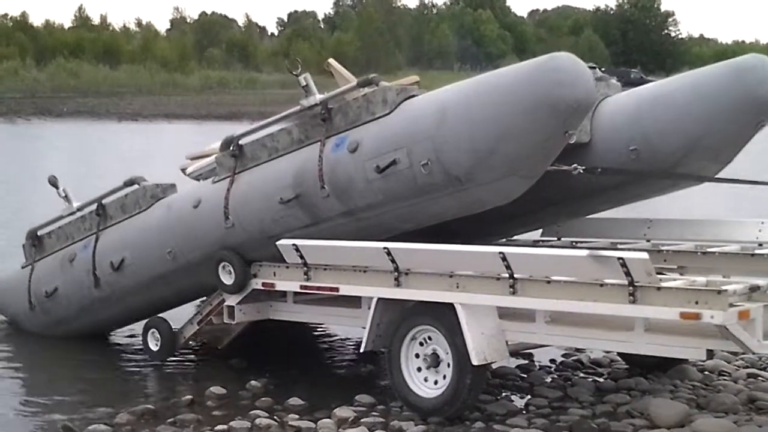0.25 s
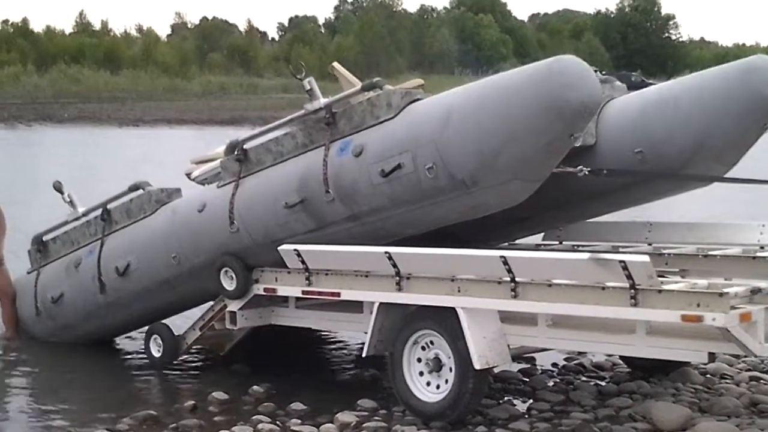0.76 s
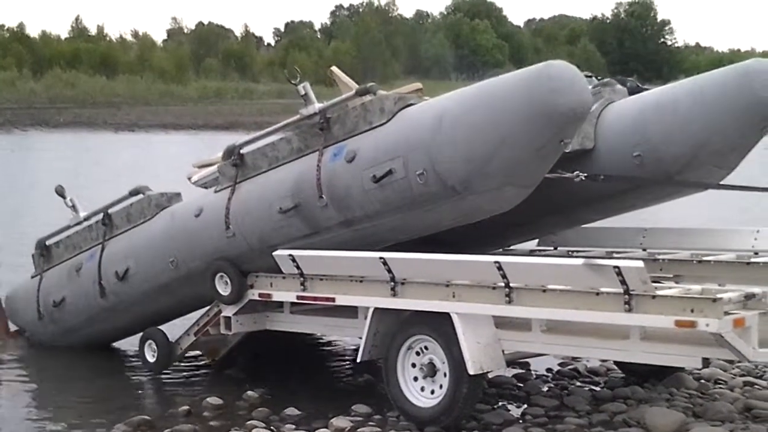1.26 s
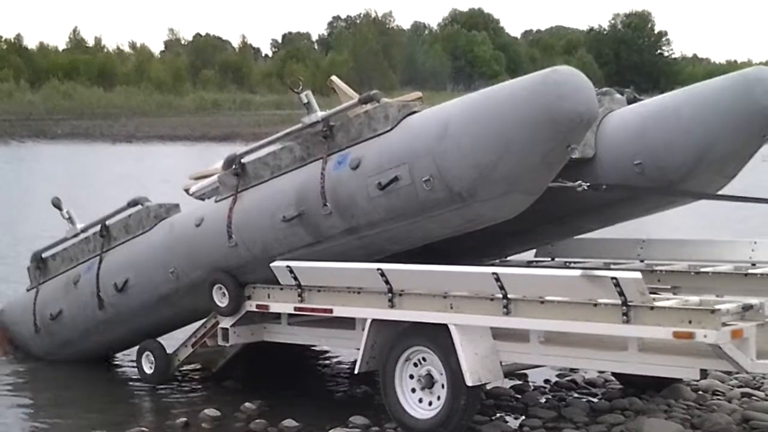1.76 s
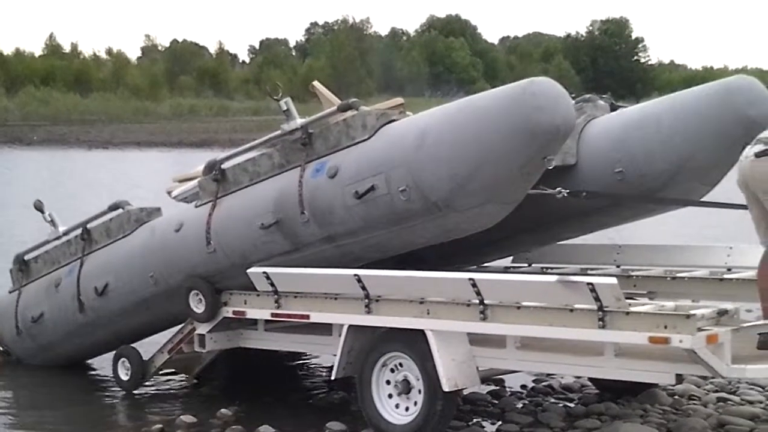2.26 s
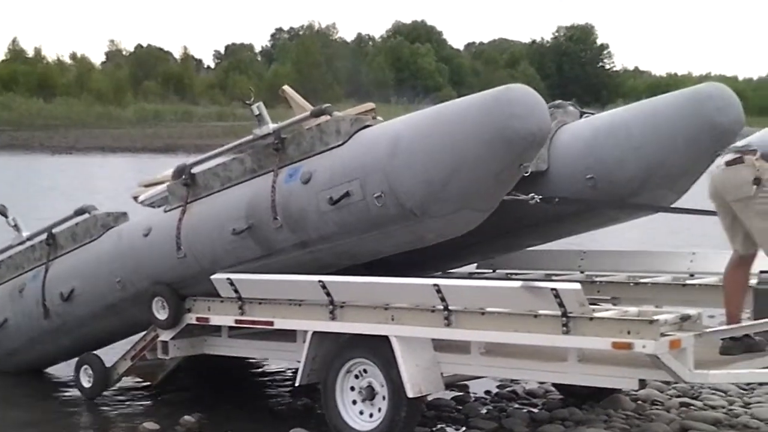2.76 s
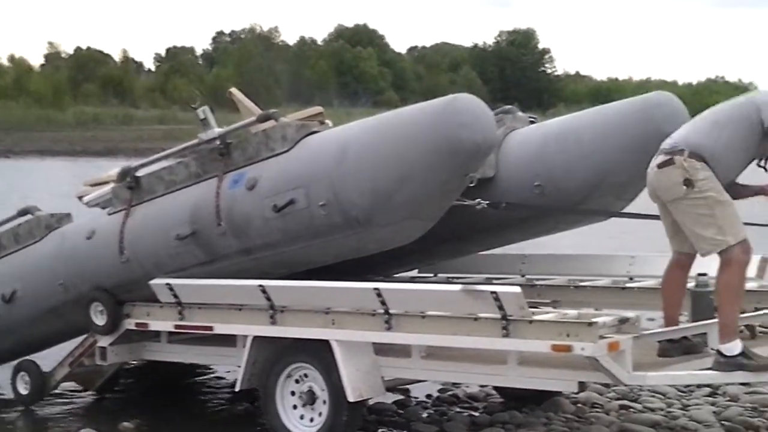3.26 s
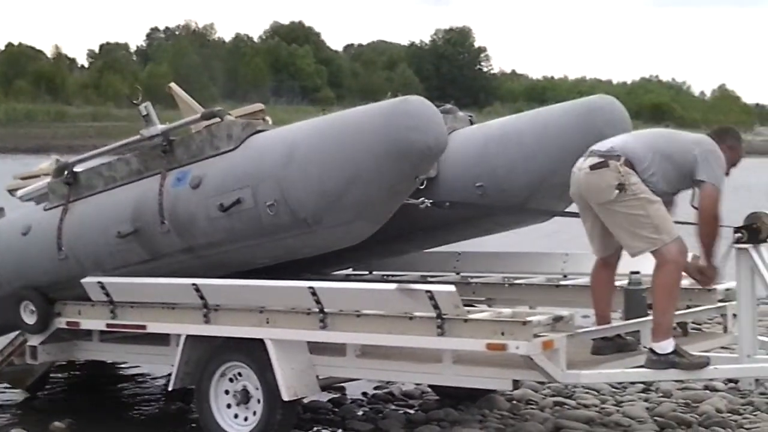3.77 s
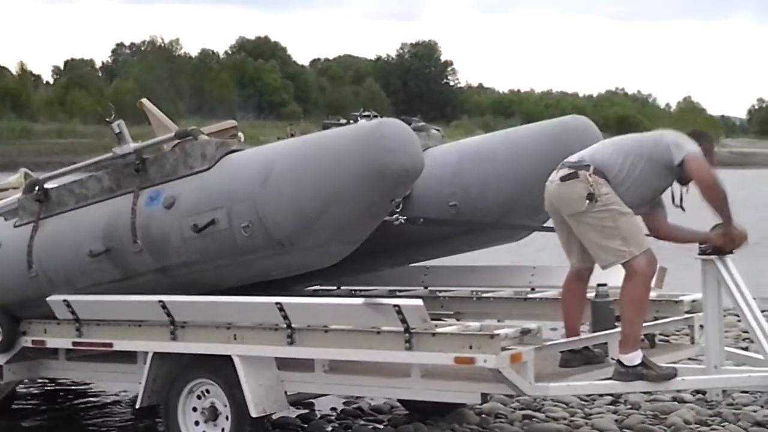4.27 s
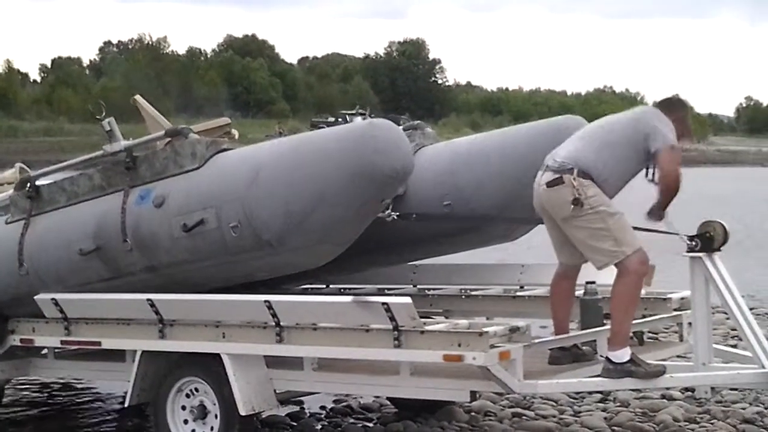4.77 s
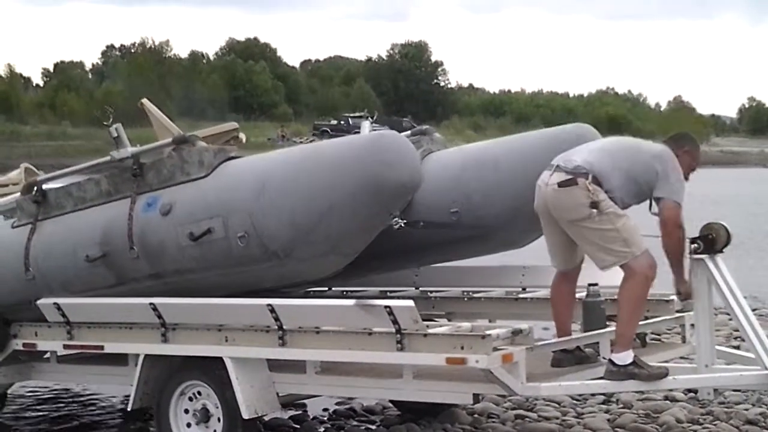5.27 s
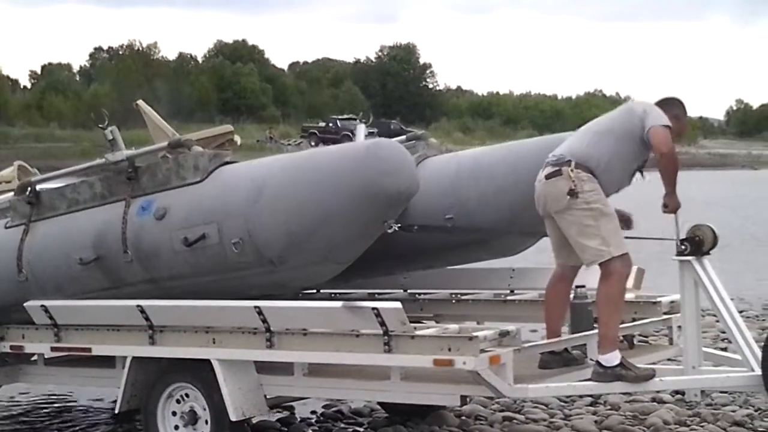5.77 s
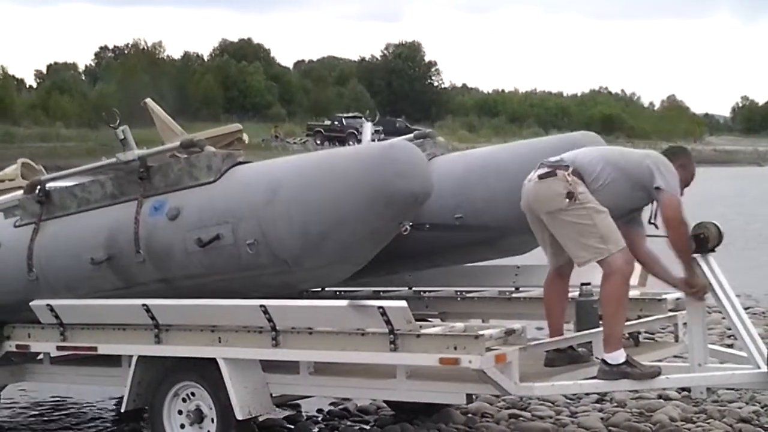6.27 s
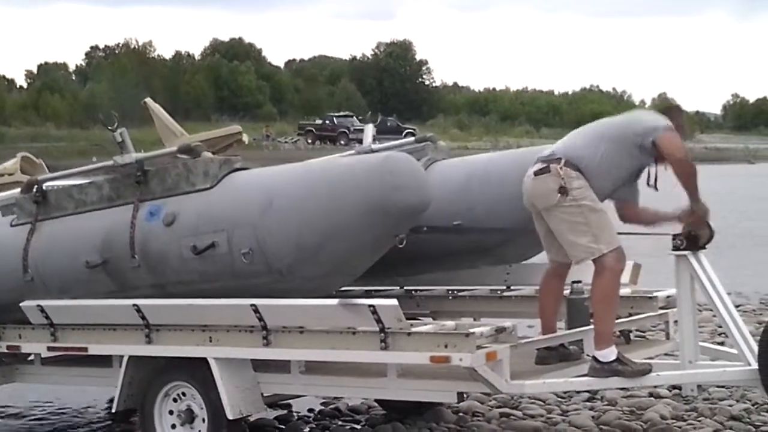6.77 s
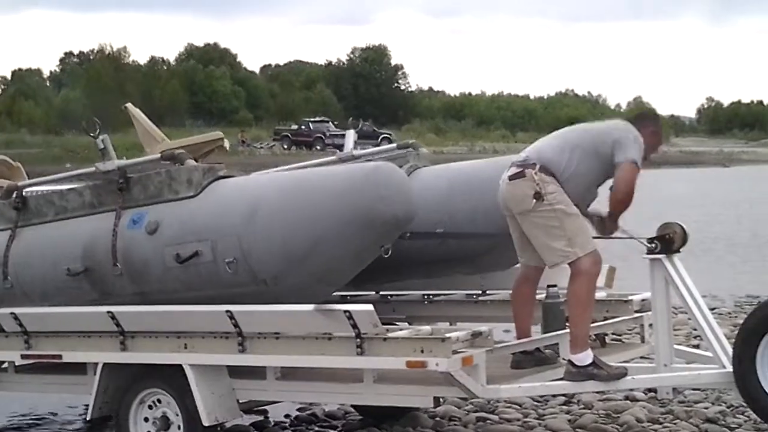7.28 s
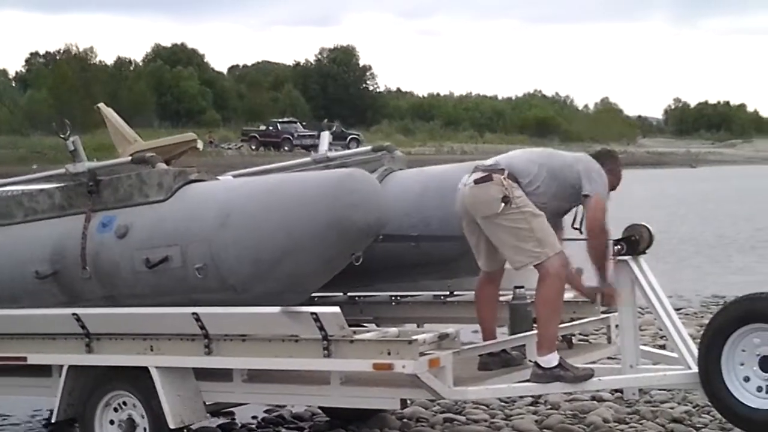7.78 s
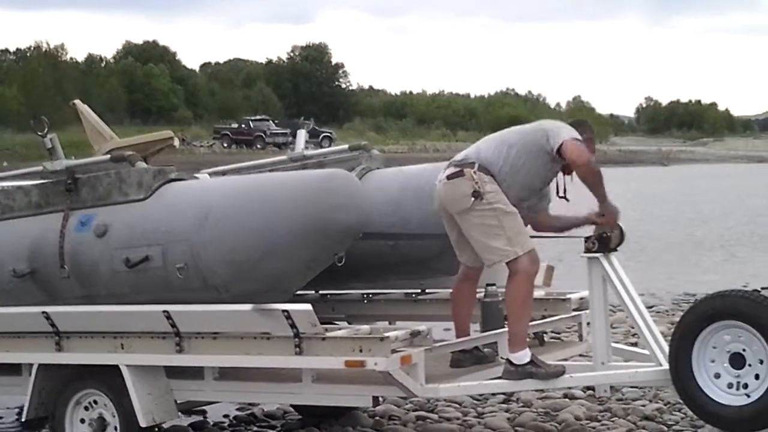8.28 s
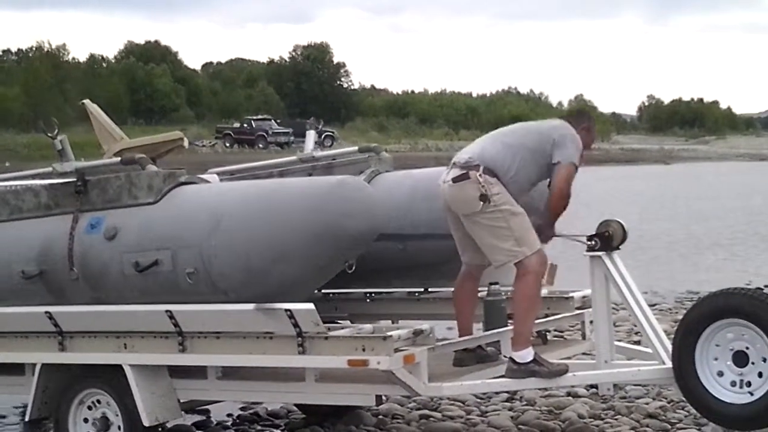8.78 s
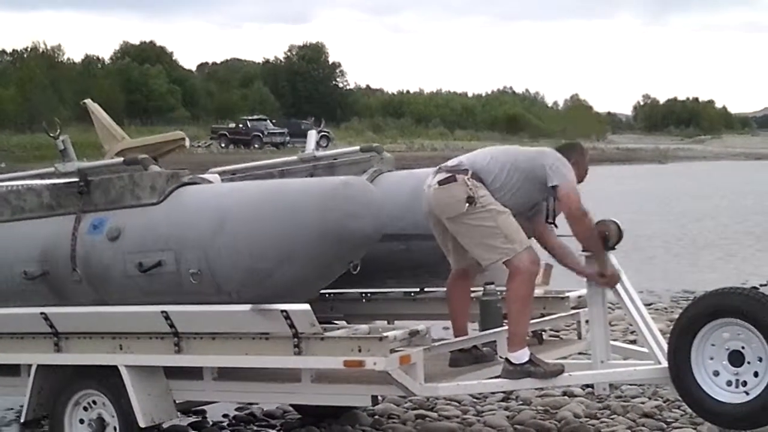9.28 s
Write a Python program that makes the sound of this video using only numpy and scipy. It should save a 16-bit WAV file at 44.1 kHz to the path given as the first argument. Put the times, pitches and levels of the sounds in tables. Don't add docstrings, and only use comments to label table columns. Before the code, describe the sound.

A hand-cranked metal winch ratchets loudly and rapidly on a boat trailer, sharp clacks in uneven bursts, with light wind and river hiss.

```python
import sys
import numpy as np
from scipy import signal
from scipy.fft import rfft, irfft, next_fast_len
from scipy.io import wavfile
from scipy.ndimage import uniform_filter1d, map_coordinates

SR = 44100
rng = np.random.default_rng(int(sys.argv[2]) if len(sys.argv) > 2 else 0)


def transcribe(signal):
    frames = np.atleast_2d(signal).T
    limited = np.clip(frames, -1, 1)
    pcm = np.round(limited * 32767).astype(np.int16)
    wavfile.write(sys.argv[1], SR, pcm)


def volts_from_decibels(level):
    exponent = np.asarray(level, float) / 20
    return 10 ** exponent


N = 419832
LIFE_SAMPLES = SR // 4

# (first tooth [s], teeth
# [count], first gap [ms], last gap [ms])
STROKES = [(0.0195, 3, 90.2, 60.3), (0.2206, 3, 50.2, 56.3), (0.4218, 3, 69.3, 72.9),
           (0.6304, 3, 58.7, 64.0), (0.9079, 5, 70.2, 38.6), (1.161, 3, 60.4, 70.2),
           (1.3467, 3, 60.4, 62.5), (1.8877, 5, 77.9, 66.8), (2.2504, 3, 73.4, 64.2),
           (2.4472, 5, 66.4, 77.4), (2.8078, 6, 62.7, 51.1), (3.1474, 5, 51.1, 61.1),
           (3.4411, 5, 68.9, 72.9), (3.7879, 5, 55.6, 61.4), (4.0983, 5, 76.5, 59.1),
           (4.4178, 3, 42.1, 46.1), (4.5961, 6, 64.9, 75.4), (5.0369, 4, 61.6, 47.9),
           (5.2483, 3, 61.5, 105.4), (5.4782, 4, 69.0, 60.2), (6.0988, 7, 89.0, 52.5),
           (6.574, 4, 50.2, 59.6), (6.8079, 3, 67.4, 60.6), (6.9937, 6, 53.6, 58.7),
           (7.3428, 6, 76.1, 65.3), (7.7517, 6, 47.4, 59.1), (8.0843, 5, 78.7, 75.2),
           (8.459, 8, 56.3, 64.8), (8.9594, 3, 90.6, 86.9), (9.2109, 6, 62.2, 56.9)]
# (strength [dB], looseness of the pawl seat [dB])
GRIP = [(1.5, 1), (0, 0), (1.5, 0.0), (0, 0.5), (1, 2), (0, -0.5), (1.5, -0.5), (-0.5, 1.5), (0.5, 1),
        (1.5, -1.0), (-0.5, 2.5), (-1, -2.5), (0.5, 2), (1, -1.0), (1.0, -1.0), (-1.0, 1.5), (1, 1),
        (0.5, 1), (-2.0, -1.5), (1.5, -2), (0.0, 0.5), (-0.5, -2.0), (0, 0), (0.0, -0.5), (0.5, 1),
        (0, 1.5), (0.5, 3), (0.5, -1.0), (1, -0.5), (0.5, 1)]
# (time [s], peak [dB], post ring [dB])
SLIPS = [
    (1.714, -13, -24),
    (5.8304, -15, -20),
    (5.9568, -5, -49),
]
POST_HZ = [447, 495, 987, 1052, 1108]
# (level [dB], t60 [s])
POST_MODES = [(-8.5, 0.12), (-16, 0.19), (0, 0.12), (6.5, 0.073), (7, 0.052)]
POST_SIGN = [1, -1, 1, 1, 1]
DRUM_HZ = [1442, 1603, 1719, 1885, 1980, 2260, 2605, 2808, 2915, 3085, 3530, 3660]
GEAR_HZ = [3787, 4090, 4708, 4950, 5230, 5390, 5500, 5715, 8365, 8690, 11300]
# (level [dB], t60 [s])
DRUM_GEAR_MODES = [(-15, .17), (-11, .22), (-11, .18), (-11, .15), (-7, .11), (-12, .11), (-6, .13),
                   (-5, .15), (-8, .11), (-8, .12), (-8, .11), (-7, .11), (0, .13), (-5, .14), (-7, .12),
                   (-5, .1), (-7, .11), (-7, .14), (-7, .12), (-10, .11), (-20, .12), (-22, .11),
                   (-16, .09)]
# (frequency [Hz], density [dB per Hz])
SHEET_COLOUR = [(150, -72), (300, -22), (600, -26.5), (1010, -13), (1350, -18.5), (1950, -4.5), (2400, -11),
                (2750, -2.5), (3300, -7.5), (3800, -0.5), (5600, -5.5), (6400, -13), (11500, -22.5),
                (15500, -26.5)]
# (frequency [Hz], t60 [s])
SHEET_DECAY = [(300, 0.37), (1000, 0.44), (2500, 0.14), (4500, 0.076), (8000, 0.11), (13000, 0.073)]
# (frequency [Hz], time constant [s])
SHEET_RISE = [(300, 0.0068), (1100, 0.0034), (1600, 0.00068), (2700, 0.0003), (3800, 0.0033),
              (5000, 0.0014), (9000, 0.00016)]
# (time [s], frequency [Hz], level [dB], t60 [s])
PINGS = [
    (5.832, 2560, -24, .1),
    (5.834, 4750, -29, .08),
    (5.958, 2000, -24, .25),
    (5.960, 4120, -21, .11),
    (1.715, 2100, -33, .14),
    (1.223, 2250, -19, .09),
]
# (time [s], peak [dB], frequency [Hz])
GUSTS = [(3.398, -24, 288), (3.845, -29, 189), (4.071, -31, 236), (4.106, -24, 233), (4.182, -25.5, 301),
         (4.23, -24, 255), (4.257, -25, 186), (4.515, -35, 220), (4.568, -24, 207), (4.858, -15.5, 298),
         (4.911, -21.5, 253), (4.928, -29, 172), (5.299, -24.5, 196), (5.946, -29.5, 197),
         (6.017, -21, 209), (6.035, -31, 215), (6.19, -25, 217), (6.222, -13.5, 306), (6.493, -24, 209),
         (6.533, -14, 226), (6.581, -32, 242), (6.687, -27, 253), (6.753, -24, 244), (7.066, -19, 195),
         (7.275, -27, 244), (7.304, -28, 187), (7.649, -29, 174), (7.746, -25, 320), (9.053, -26, 220),
         (9.084, -28, 193)]
# (time [s], level [dB])
WIND_LEVEL = [
    (0.0, -51.5),
    (1.35, -58.5),
    (1.77, -61),
    (2.15, -56),
    (5.01, -53),
    (5.73, -59),
    (6.73, -52),
    (7.42, -59),
    (9.52, -50),
]
# (frequency [Hz], density [dB per Hz])
RUMBLE_COLOUR = [(12, -47), (20, 5), (76, -30), (134, 2.5), (173, -12.5), (214, 1.5), (315, -2), (344, 3.5),
                 (400, 1.5), (520, -5), (880, -120)]
# (time [s], from [Hz], to [Hz], level [dB])
BIRD_NOTES = [
    (0.871, 5240, 4900, -54),
    (5.925, 4650, 4350, -54),
    (6.075, 4900, 4300, -49),
]
# (frequency [Hz], density [dB per Hz])
RIVER_COLOUR = [(180, -32), (300, -2), (535, -6), (1180, -1), (1370, -7), (1620, -6), (4210, -13),
                (6250, -22), (14000, -23), (15500, -43)]
# (frequency [Hz], weakest surviving line [dB])
TREBLE_FLOOR = [(8000, -60), (9500, -50), (10200, -46), (11600, -45.5), (12000, -45), (15000, -46)]
# (frequency [Hz], level [dB])
SIDE_COLOUR = [(40, -5), (150, -1), (2000, -4), (8000, 1.5)]

DROP_DB, POST_DB, BRIGHT_DB = -1.02, -22, -0.43
LOOSE_POST_DB_PER_DB, LOOSE_BRIGHT_DB_PER_DB = 0.97, 0.54
POST_DB_PER_S, BRIGHT_DB_PER_S = -0.12, 0.29
SCATTER_DB, SEAT_SCATTER_DB = 0.54, 0.75
FRAME_RING_DB, FRAME_LASTS_RATIO = -20, 4.2
CRACK_DB, CRACK_S = -2.5, 0.0059
EDDY_LEAD_S, EDDY_DB, EDDY_PITCH_RATIO = 0.0219, -14, 0.76
RIVER_DB = -48.5
LOW_CUT_HZ, TOP_CUT_HZ = 85, 14700
FRAME_SAMPLES, GRID_SAMPLES = 1024, 420
APART_SHARE, APART_S = .28, .055


def unit(x):
    return x / np.sqrt(np.mean(x ** 2) + 1e-20)


def along(points, hz):
    f, v = np.transpose(points)
    return np.interp(np.log(hz + 1), np.log(f + 1), v)


def wobble(rate_hz):
    knots = rng.standard_normal(int(N * rate_hz / SR) + 4)
    return map_coordinates(knots, [np.arange(N) * rate_hz / SR])


def hiss(colour):
    m = next_fast_len(N + 8192)
    gain = volts_from_decibels(along(colour, np.fft.rfftfreq(m, 1 / SR)))
    return unit(irfft(rfft(rng.standard_normal(m)) * gain, m)[:N])


def place(rows, times_s):
    at = np.round(times_s * SR).astype(int)[:, None] + np.arange(rows.shape[1])
    return np.bincount(at.ravel(), rows.ravel(), minlength=N + SR)[:N]


def winch():
    s, db, post_db, bright_db = teeth()
    count = len(s)
    sheet = clatter(bright_db, hold_s=0.0056, tooth_db=1.6)
    drum = ring(DRUM_HZ + GEAR_HZ, DRUM_GEAR_MODES, count, scatter_db=3.5, phase_scatter_rad=2.5,
                rise_s=.004, detune=.0017)
    sheet = sheet * chatter(count, depth_db=2, lasting_s=.03)
    post = ring(POST_HZ, POST_MODES, count, scatter_db=2.5, phase_scatter_rad=.4,
                rise_s=.012, detune=.003, sign=POST_SIGN)
    drop = volts_from_decibels(-15.0) * sheet + volts_from_decibels(-19) * drum
    size = np.linalg.norm(drop[:, :SR // 30], axis=1, keepdims=True)
    drop = volts_from_decibels(db[:, None]) * drop * size.mean() / size
    flight_s = .0105 + .0015 * rng.standard_normal(count)
    bounce = volts_from_decibels(-6 + 1.3 * rng.standard_normal((count, 1))) * drop
    post = volts_from_decibels(db + post_db + 2.0)[:, None] * post
    return place(drop, s - .001) + place(bounce, s + flight_s) + place(post, s - .001)


def teeth():
    s, push = crank()
    strength_db, loose_db = np.transpose(GRIP)[:, push]
    chance = rng.standard_normal((len(s), 2))
    loose_db = loose_db + SEAT_SCATTER_DB * chance[:, 0]
    from_middle_s = s - N / SR / 2
    db = DROP_DB + strength_db + SCATTER_DB * chance[:, 1]
    post_db = POST_DB + LOOSE_POST_DB_PER_DB * loose_db + POST_DB_PER_S * from_middle_s
    bright_db = BRIGHT_DB + LOOSE_BRIGHT_DB_PER_DB * loose_db + BRIGHT_DB_PER_S * from_middle_s
    slip_s, slip_db, slip_post_db = np.transpose(SLIPS)
    return (np.r_[s, slip_s], np.r_[db, slip_db],
            np.r_[post_db, slip_post_db], np.r_[bright_db, 0 * slip_s + 1.5])


def crank():
    s = []
    for start_s, count, first_ms, last_ms in STROKES:
        gaps_ms = np.linspace(first_ms, last_ms, int(count) - 1)
        s.append(start_s + np.cumsum(np.r_[0, gaps_ms]) / 1000)
    return np.concatenate(s), np.repeat(np.arange(len(s)), [len(push) for push in s])


def clatter(bright_db, hold_s, tooth_db):
    hz, t, z = signal.stft(rng.standard_normal((len(bright_db), LIFE_SAMPLES)), SR, nperseg=128)
    tooth = unit(uniform_filter1d(rng.standard_normal(z.shape[:2]), size=3, axis=1))
    high = 1 / (1 + (6500 / (hz + 1)) ** 6)
    colour = volts_from_decibels(along(SHEET_COLOUR, hz) + tooth_db * tooth + np.outer(bright_db, high))
    hz = hz[:, None]
    held_s = np.maximum(t - hold_s * np.clip(1.5 - hz / 9000, 0, 1), 0)
    fading_db = -60 * held_s / along(SHEET_DECAY, hz)
    frame = volts_from_decibels(FRAME_RING_DB + fading_db / FRAME_LASTS_RATIO)
    crack = volts_from_decibels(CRACK_DB) * np.exp(-t / CRACK_S)
    filling = 1 - np.exp(-(t + 0.00022) / np.abs(along(SHEET_RISE, hz)))
    life = (volts_from_decibels(fading_db) + frame + crack) * filling
    rows = signal.istft(z * colour[:, :, None] * life, SR, nperseg=128)[1][:, :LIFE_SAMPLES]
    onset = 1 - np.exp(-np.arange(LIFE_SAMPLES) / SR / .0016)
    return rows / np.sqrt(np.mean(rows[:, :SR // 50] ** 2)) * onset


def chatter(count, depth_db, lasting_s):
    knots = np.minimum(rng.exponential(size=(count, LIFE_SAMPLES // 48 + 2)), 3.2) - 1
    spikes = signal.resample_poly(knots, 48, 1, axis=1)[:, :LIFE_SAMPLES]
    return volts_from_decibels(depth_db * spikes * np.exp(-np.arange(LIFE_SAMPLES) / SR / lasting_s))


def ring(hz, modes, count, scatter_db, phase_scatter_rad, rise_s, detune, sign=1):
    db, t60 = np.transpose(modes)[:, :, None]
    t = np.arange(LIFE_SAMPLES) / SR
    life = volts_from_decibels(db - 60 * t / t60) * (1 - np.exp(-t / abs(rise_s)))
    chance = rng.standard_normal((count, 2, len(modes)))
    strength = np.array(sign) * volts_from_decibels(scatter_db * chance[:, 0])
    push = strength * np.exp(1j * phase_scatter_rad * chance[:, 1])
    seats_hz = np.array(hz) * (1 + detune * rng.standard_normal((5, len(modes))))
    seat = rng.integers(len(seats_hz), size=count)
    rows = np.zeros((count, LIFE_SAMPLES))
    for k, shifted_hz in enumerate(seats_hz):
        turning = np.exp(2j * np.pi * np.outer(shifted_hz, t))
        rows[seat == k] = (push[seat == k] @ (life * turning)).imag
    return rows


def pings():
    s, hz, db, t60 = np.transpose(PINGS)[:, :, None]
    t = np.arange(LIFE_SAMPLES) / SR
    life = volts_from_decibels(db - 60 * t / t60) * (1 - np.exp(-t / 0.00037))
    return place(life * np.sin(2 * np.pi * hz * t), s[:, 0])


def wind():
    pops = np.array(GUSTS)
    eddies = pops * [1, 1, EDDY_PITCH_RATIO] + [-EDDY_LEAD_S, EDDY_DB, 0]
    s, db, hz = np.transpose(np.r_[pops, eddies])[:, :, None]
    t = np.arange(SR // 10) / SR - 1 / 20
    start_s = s[:, 0] - 1 / 20
    phase = 2 * np.pi * (hz * t + rng.random(s.shape))
    puffs = np.exp(-(t * hz / 0.92) ** 2) * (np.cos(phase) + 0.2 * np.cos(phase / 2))
    swell = place(volts_from_decibels(db - 22) * np.exp(-(t / 0.023) ** 2), start_s)
    calm = volts_from_decibels(np.interp(np.arange(N) / SR, *np.transpose(WIND_LEVEL)) + 6.5)
    rumble = (calm + swell) * unit(volts_from_decibels(3.4 * wobble(35)) * hiss(RUMBLE_COLOUR))
    return rumble + place(volts_from_decibels(db - 1.0) * puffs, start_s)


def bird():
    s, from_hz, to_hz, db = np.transpose(BIRD_NOTES)[:, :, None]
    u = np.linspace(0, 1, SR // 20)
    phase = 2 * np.pi * np.cumsum(from_hz + (to_hz - from_hz) * u, axis=1) / SR
    notes = np.sin(np.pi * u) * np.sin(phase)
    return place(volts_from_decibels(db) * notes, s[:, 0] - 1 / 40)


def river():
    return volts_from_decibels(RIVER_DB + 2 * wobble(9)) * hiss(RIVER_COLOUR)


def scene():
    return np.tile(winch() + pings() + river() + wind() + bird(), (2, 1))


def thin_treble(x, rise_db):
    highpass = signal.butter(8, 8000, "high", fs=SR, output="sos")
    treble = signal.sosfiltfilt(highpass, x)
    power = np.abs(uniform_filter1d(treble ** 2, size=128)) + 1e-14
    jump = power > volts_from_decibels(2 * rise_db) * np.roll(power, FRAME_SAMPLES // 8)
    padding = (GRID_SAMPLES, -(N + GRID_SAMPLES) % FRAME_SAMPLES)
    frames = np.pad(jump, padding).reshape(-1, FRAME_SAMPLES)
    struck = np.maximum.accumulate(frames, axis=1).ravel()[GRID_SAMPLES:][:N]
    whole = uniform_filter1d(struck * 1., size=64)
    hz, _, z = signal.stft((1 - whole) * treble, SR, nperseg=2 * FRAME_SAMPLES)
    full = signal.stft((1 - whole) * x, SR, nperseg=2 * FRAME_SAMPLES)[2]
    loud = np.linalg.norm(full, axis=0)
    near = np.sqrt(np.abs(uniform_filter1d(np.abs(z) ** 2, size=7, axis=0)))
    lines = z * (near > loud * volts_from_decibels(along(TREBLE_FLOOR, hz))[:, None])
    kept = signal.istft(lines, SR, nperseg=2 * FRAME_SAMPLES)[1][:N]
    attacked = np.repeat(frames.any(axis=1), FRAME_SAMPLES)[GRID_SAMPLES:][:N]
    waiting = uniform_filter1d(attacked * .5, size=64)
    return x - (1 - whole) * (treble - (1 - waiting) * kept)


def side_noise(x, depth_db):
    hz, t, z = signal.stft(x, SR, nperseg=FRAME_SAMPLES)
    s = crank()[0]
    s = s[rng.random(len(s)) < APART_SHARE, None]
    on = ((t > s + .011) & (t < s + APART_S - .011)).any(axis=0)
    smooth = uniform_filter1d(np.abs(z), size=9, axis=0)
    level = smooth ** 0.67 * volts_from_decibels(depth_db + along(SIDE_COLOUR, hz))[:, None]
    phase = np.exp(2j * np.pi * rng.random(z.shape))
    return signal.istft(level * on * phase, SR, nperseg=FRAME_SAMPLES)[1][:N]


def band_limit(x):
    return signal.sosfilt(signal.butter(12, 15970, fs=SR, output="sos"), x)


def record(dry):
    low_cut = signal.butter(1, LOW_CUT_HZ, "high", fs=SR, output="sos")
    lean = signal.sosfilt(low_cut, dry[0])
    soft = lean / (1 + np.abs(lean / .95) ** 6) ** (1 / 6)
    top_cut = signal.cheby1(12, .5, TOP_CUT_HZ, fs=SR, output="sos")
    mid = thin_treble(signal.sosfiltfilt(top_cut, soft), rise_db=8)
    side = side_noise(mid, depth_db=-30)
    return band_limit(np.array([mid + side, mid - side]))


dry = scene()
out = record(dry)
transcribe(out)
```